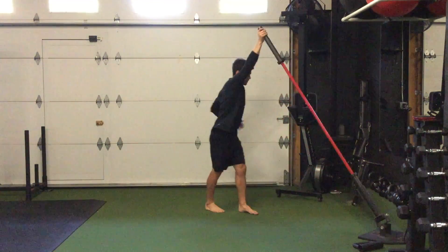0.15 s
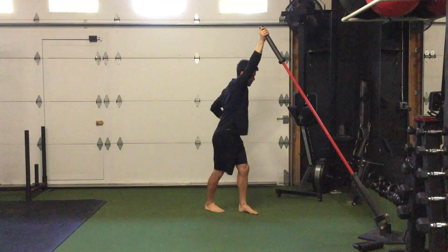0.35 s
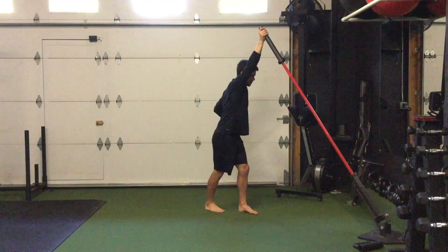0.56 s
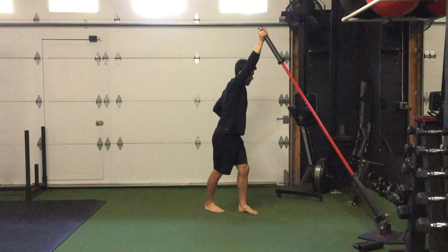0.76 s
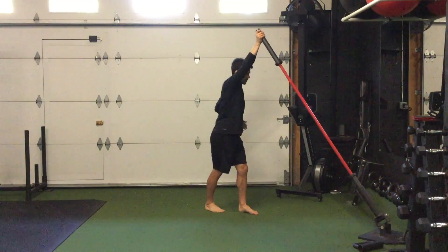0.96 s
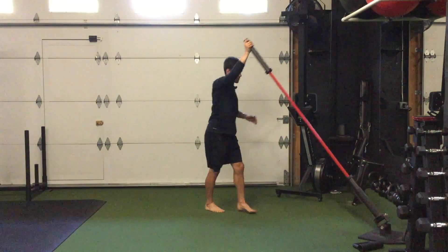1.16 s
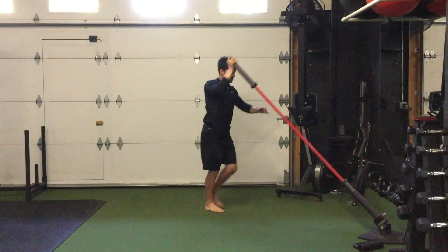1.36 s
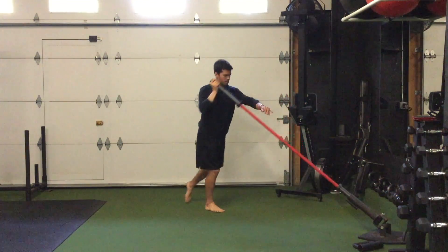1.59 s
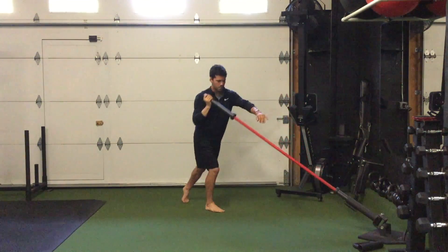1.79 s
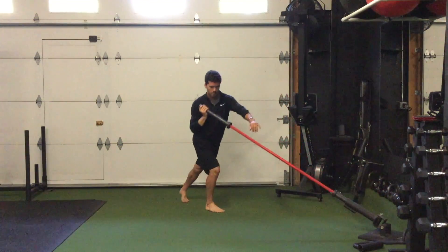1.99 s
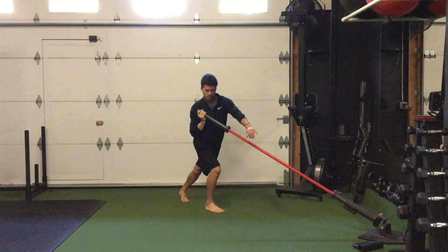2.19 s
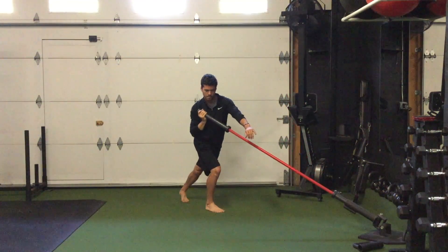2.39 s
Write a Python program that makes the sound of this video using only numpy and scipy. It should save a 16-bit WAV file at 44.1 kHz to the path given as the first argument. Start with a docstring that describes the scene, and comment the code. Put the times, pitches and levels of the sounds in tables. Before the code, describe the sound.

A steel barbell squeaks, clanks and briefly rings in its floor pivot in a garage gym.

```python
"""A barbell swings in its steel floor pivot in a garage gym, heard at one microphone.
The sleeve sticks and slips in the socket with a squeak, slides with a dull scraping knock,
then clanks against the socket wall; bar and room ring out.
Afterwards only the faint rustle of clothes and soft barefoot steps on turf
are left over the room's steady ventilation."""
import sys
import numpy as np
from scipy import signal
from scipy.fft import rfft, irfft
from scipy.io import wavfile

SR = 44100
rng = np.random.default_rng(int(sys.argv[2]) if len(sys.argv) > 2 else 0)


def persist_wave(psi):
    """Save psi, clipped to +-1, as 16-bit WAV."""
    counts = np.round(np.clip(psi, -1, 1) * 32767).astype(np.int16)
    wavfile.write(sys.argv[1], SR, np.atleast_2d(counts).T)


N = 107559
T = np.arange(N) / SR

# The sleeve's squeak. Each row: time in seconds, pitch in Hz, levels of harmonics 1, 2 and 3 in dB.
SQUEAK = [(0.005, 970, -72, -74, -69.5), (0.021, 954, -52, -53, -77), (0.041, 957.3, -41, -45, -88.5),
          (0.053, 964, -41, -49.5, -62.5), (0.071, 959, -41.5, -42, -97), (0.097, 962, -36.5, -46, -64.5),
          (0.127, 953.1, -40, -42, -65.5), (0.151, 971.2, -44.5, -57, -65.5),
          (0.161, 948, -40.5, -52, -71.5), (0.173, 953, -49, -52.5, -60.5), (0.183, 963, -36, -74, -72.5),
          (0.191, 957, -37, -51, -60), (0.199, 948.6, -33, -41.5, -57), (0.215, 957.6, -41, -53, -73)]
# Its faint upper partials. Each row: harmonic number, level in dB against the octave.
OVERTONES = [(4, -27), (5, -34.5), (6, -42), (7, -31.5), (8, -42.5), (9, -40.5)]
# The sleeve knocks, then clanks and chatters. Each row: start in seconds, relative level in dB.
KNOCKS = [(.194, -44), (.204, -44), (.217, -44.5), (.238, -58)]
CLANKS = [(.309, -44), (.3165, -43.5), (.3225, -50), (.334, -50), (.350, -49.5), (.383, -50)]
# Ring of bar and socket. Each row: frequency in Hz, relative level in dB after a knock,
# the same after a clank, seconds to fall 60 dB.
STEEL_MODES = [(301, -11, -13, 1.2), (432, -7, -11, 1.0), (711, -20, -17, 1.1), (733, -24, -17, 1.0),
               (958.5, -1, -8, 1.0), (1146, -14, -17, .9), (1242, -18, -10, 1.2), (1496, -19, -14, .8),
               (1914, -13, -15, .6), (2229, -19, -23, .6), (2379, -30, -17, .65), (2700, -36, -21, .65),
               (3020, -34, -17, .65), (3427, -36, -18, .55), (4050, -27, -22, .5), (4355, -36, -16, .56),
               (5146, -45, -24, .5), (5491, -40, -21, .4), (5600, -26, -25, .45), (5720, -29, -23, .45),
               (7040, -31, -28, .55), (8140, -40, -24, .55), (8625, -31, -14, .45), (9351, -48, -24, .42),
               (9598, -48, -22, .4), (9905, -48, -24, .4), (12263, -52, -31, .4), (13636, -50, -30, .27),
               (14325, -31, -31, .5)]
# The sleeve's last squeal and its gritty friction. Each row: time in seconds, level in dB.
SQUEAL_LEVEL = [(.535, -105), (.56, -74.5), (.6, -74.5), (.64, -83), (.72, -93), (.8, -120)]
FRICTION_LEVEL = [(0, -70.5), (.05, -67.5), (.13, -78), (.185, -70.5), (.215, -58.5), (.245, -53),
                  (.3, -60.5), (.36, -88)]
# Tone of the steel at the microphone. Each row: frequency in Hz, relative spectral density in dB.
KNOCK_COLOUR = [(60, -26.5), (150, 0.5), (300, -1.5), (350, 5), (425, -2.5), (540, -4.5), (750, -1.5),
                (1200, -4.5), (1600, -8.5), (2200, -3), (3000, -30), (6500, -21), (10000, -36),
                (15000, -45)]
CLANK_COLOUR = [(60, -26), (150, -7), (300, -11), (430, 3), (560, -3.5), (900, -2), (1250, 1.5),
                (1500, -3.5), (2500, -2.5), (4400, -6), (6200, -10), (7400, -17.5), (9700, -12),
                (11500, -32), (15000, -24)]
FRICTION_COLOUR = [(300, -1), (1300, 12.5), (2200, 1.5), (4200, 6), (6500, -5.5), (7400, -11), (8500, 0.5),
                   (10500, -16), (15000, -15)]

# At floor level, thuds of pivot base and bare feet, and brushes of a foot on the turf.
# Each row: start in seconds, relative level in dB.
THUDS = [(.235, -51), (.44, -52.5), (.545, -61.5), (1.235, -74), (1.405, -63), (1.51, -62), (1.69, -55),
         (1.716, -57), (2.26, -65.5), (2.35, -62)]
BRUSHES = [(1.295, -74.5), (1.785, -74.5)]
# The lifter's clothes. Each row: time in seconds, level in dB.
RUSTLE_LEVEL = [(0, -88.5), (.9, -91), (1.05, -88), (1.17, -73.5), (1.25, -77.5), (1.31, -74),
                (1.38, -80.5), (1.43, -74.5), (1.55, -83), (1.75, -85.5), (1.9, -73.5), (2.02, -73.5),
                (2.2, -81), (2.44, -98)]
# Tone of floor, clothes and ventilation. Each row: frequency in Hz, relative spectral density in dB.
THUD_COLOUR = [(40, -20), (90, -5.5), (180, 7.5), (260, -10.5), (450, -28), (1500, -51.5)]
BRUSH_COLOUR = [(300, -21), (1000, -5), (2000, 8), (3200, -15), (9000, -29)]
RUSTLE_COLOUR = [(300, 15), (1000, -8.5), (2200, 1.5), (4500, 0), (7500, -8.5), (11000, -10),
                 (15000, -19.5)]
VENT_COLOUR = [(25, -46), (38, -21.5), (50, 0.5), (120, 1), (230, -2), (320, -8.5), (480, -16), (700, -12),
               (1000, -15.5), (1400, -9), (1750, -28), (2500, -30.5), (4500, -31.5), (7300, -38),
               (8700, -33.5), (10500, -38.5), (15000, -40.5)]
# The garage's reverberation. Each row: frequency in Hz, seconds to fall 60 dB.
ROOM_T60 = [(100, 1.18), (350, 1.26), (1000, 1.2), (2000, 0.82), (5000, 0.77), (8000, 0.51), (14000, 0.32)]

SQUEAK_JITTER, OVERTONE_FLICKER_DB, SQUEAK_RELEASE_S = 0.002, 3.5, 0.017
RING_DB, RING_WAVER, RING_WAVER_HZ = -4, 0.38, 23  # gain, then share and speed of each mode's beating
GRIT_DB, GRIT_HZ = 2, 400
RIPPLE_DB, RIPPLE_HZ = 3.3, 85  # depth and width of the lesser resonances
CRACK_T60_S = 0.022
BUILD_CYCLES = 2.66  # reflections take a few cycles to build up, so the lows swell later
VENT_DB, CUTOFF_HZ = -67, 15600


def pivot():
    """The steel sleeve squeaks, knocks, clanks and rubs in its socket on the garage floor."""
    knocks = from_db(-2.5) * blows(KNOCKS, KNOCK_COLOUR, ROOM_T60, crack_db=-12)
    clanks = from_db(-0.5) * blows(CLANKS, CLANK_COLOUR, ROOM_T60, crack_db=6)
    return squeak() + knocks + clanks + bar_ring() + squeal() + friction()


def squeak():
    """Steel sticks and slips on steel in a nearly pure tone until the sleeve breaks loose."""
    hz, first_db, octave_db, third_db = in_time(SQUEAK)
    phase = 2 * np.pi * np.cumsum(hz * (1 + SQUEAK_JITTER * drift(150))) / SR
    tone = sum(from_db(db) * np.sin(k * phase) for k, db in enumerate((first_db, octave_db, third_db), 1))
    for k, db in OVERTONES:
        tone += from_db(octave_db + db + OVERTONE_FLICKER_DB * drift(45)) * np.sin(k * phase)
    attack = np.minimum(T / SQUEAK[0][0], 1)
    release = np.exp(-np.maximum(T - SQUEAK[-1][0], 0) / SQUEAK_RELEASE_S)
    return np.sqrt(2) * tone * attack * release


def bar_ring():
    """Knocks and clanks feed the same modes, which waver as their reflections overlap."""
    ring = 0
    for hz, knock_db, clank_db, t60 in STEEL_MODES:
        power = from_db(knock_db) ** 2 * dying(KNOCKS, t60) + from_db(clank_db) ** 2 * dying(CLANKS, t60)
        overlap = 1 + RING_WAVER * (drift(RING_WAVER_HZ) + 1j * drift(RING_WAVER_HZ))
        tone = np.exp(2j * np.pi * (hz * T + rng.random()))
        ring += np.sqrt(2 * power) * np.real(overlap * tone)
    return from_db(RING_DB) * ring


def squeal(hz=8590):
    """The settling sleeve rubs once more and one high mode sings briefly."""
    db, = in_time(SQUEAL_LEVEL)
    return np.sqrt(2) * from_db(db + drift(25)) * np.sin(2 * np.pi * hz * T)


def friction():
    """Steel sliding on steel hisses, strongest between the slip and the clank."""
    db, = in_time(FRICTION_LEVEL)
    sliding = T < FRICTION_LEVEL[-1][0]
    return from_db(db + GRIT_DB * drift(GRIT_HZ)) * noise(FRICTION_COLOUR) * sliding


def blows(hits, colour, t60s, crack_db):
    """Each contact reaches the microphone as a short crack, then reflections that die band by band."""
    edges = 35 * 2 ** (np.arange(37) / 4)  # quarter octaves, in Hz
    centres = np.sqrt(edges[1:] * edges[:-1])
    shares = from_db(at_hz(colour, centres)) * np.sqrt(np.diff(edges))
    shares /= np.linalg.norm(shares)
    noises = resonant_noise()
    crack = from_db(crack_db) ** 2 * dying(hits, CRACK_T60_S)
    out = 0
    for k, hz in enumerate(centres):
        bandpass = signal.butter(2, edges[k:k + 2], "band", fs=SR, output="sos")
        band = signal.sosfilt(bandpass, noises[k % 2])  # neighbouring bands stay independent
        reflections = dying(hits, at_hz(t60s, hz))
        swell = np.exp(-hz / (BUILD_CYCLES * SR))
        power = signal.lfilter([1 - swell], [1, -swell], crack + reflections)
        out += shares[k] * rms_one(band) * np.sqrt(power)
    return out


def resonant_noise():
    """Two noises coloured by the many lesser resonances of the steel."""
    hz = np.arange(N // 2 + 1) * SR / N
    ripple = np.interp(hz / RIPPLE_HZ, np.arange(2000), rng.standard_normal(2000))
    depth_db = RIPPLE_DB * np.minimum(hz / 1500, 1)
    return irfft(rfft(rng.standard_normal((2, N))) * from_db(depth_db * ripple), N)


def floor_contacts(thud_t60_s=0.11, brush_t60_s=0.3):
    """The pivot base and bare feet bump dully on the turf, and a foot brushes over it."""
    thuds = blows(THUDS, THUD_COLOUR, [(100, thud_t60_s)], crack_db=7.5)
    brushes = blows(BRUSHES, BRUSH_COLOUR, [(1000, brush_t60_s)], crack_db=-9)
    return thuds + brushes


def clothes(flicker_db=1.8):
    """Cloth rustles faintly as the lifter moves."""
    db, = in_time(RUSTLE_LEVEL)
    return from_db(db + flicker_db * drift(60)) * noise(RUSTLE_COLOUR)


def ventilation():
    """Room tone: a low, steady rush of air behind everything."""
    return from_db(VENT_DB) * noise(VENT_COLOUR)


def from_db(db):
    """Decibels to gain."""
    return 10 ** (np.asarray(db) / 20)


def rms_one(x):
    """Scale to unit power."""
    return x / np.sqrt(np.mean(x ** 2) + 1e-20)


def in_time(rows):
    """Each column of a timed table, interpolated at every sample."""
    seconds, *columns = np.transpose(rows)
    return [np.interp(T, seconds, column) for column in columns]


def at_hz(points, hz):
    """Read a table on a log-frequency axis."""
    frequencies, values = np.transpose(points)
    return np.interp(np.log(hz), np.log(frequencies), values)


def drift(rate_hz):
    """Random wander of unit power, mostly slower than rate_hz."""
    hz = np.arange(N // 2 + 1) * SR / N
    return rms_one(irfft(rfft(rng.standard_normal(N)) / (1 + (hz / rate_hz) ** 2), N))


def noise(colour):
    """Steady noise of a given spectrum, at unit power."""
    hz = np.maximum(np.arange(N // 2 + 1) * SR / N, 1)
    return rms_one(irfft(rfft(rng.standard_normal(N)) * from_db(at_hz(colour, hz)), N))


def dying(hits, t60):
    """Summed power of hits that each fall 60 dB in t60 seconds."""
    kicks = np.zeros(N)
    for start, db in hits:
        kicks[int(start * SR)] += from_db(db) ** 2
    decay = from_db(-60 / (t60 * SR)) ** 2
    return signal.lfilter([1], [1, -decay], kicks + 1e-22)


def scene():
    """Pivot in front, lifter faint and ventilation behind, all at one microphone."""
    return (pivot() + floor_contacts() + clothes() + ventilation())[None]


def record(dry):
    """The microphone's signal is cut steeply above CUTOFF_HZ."""
    return signal.sosfilt(signal.ellip(10, .1, 70, CUTOFF_HZ, fs=SR, output="sos"), dry)


dry = scene()
out = record(dry)
persist_wave(out)
```